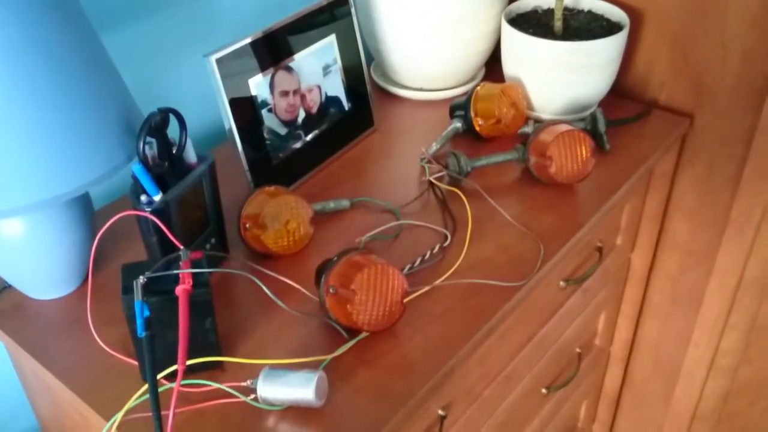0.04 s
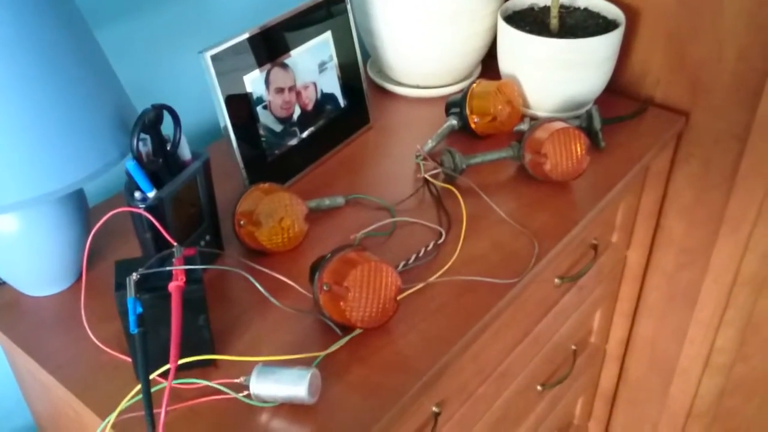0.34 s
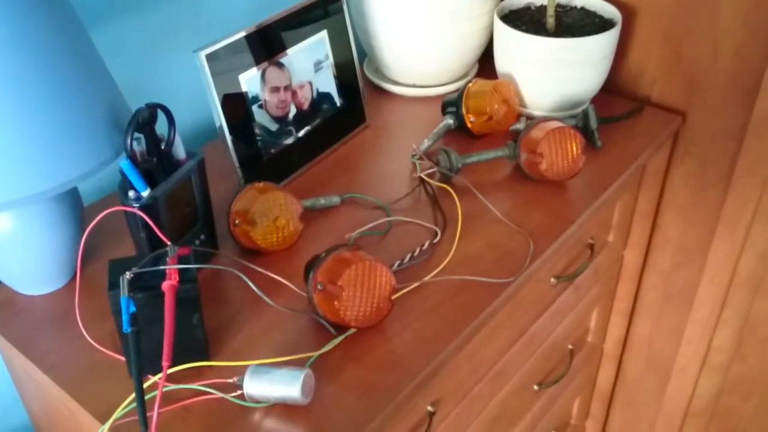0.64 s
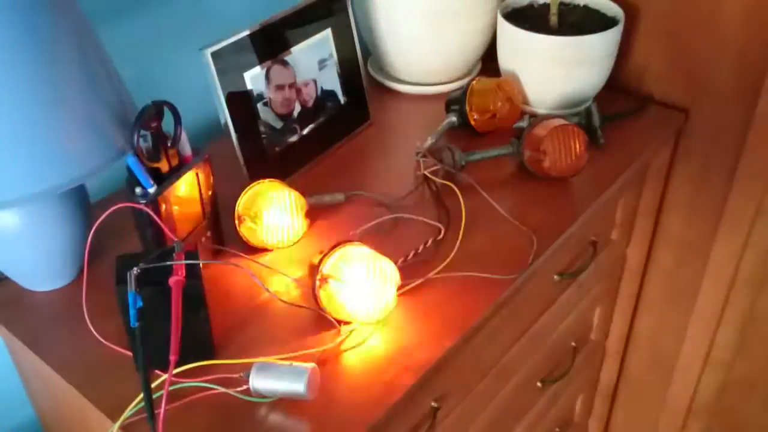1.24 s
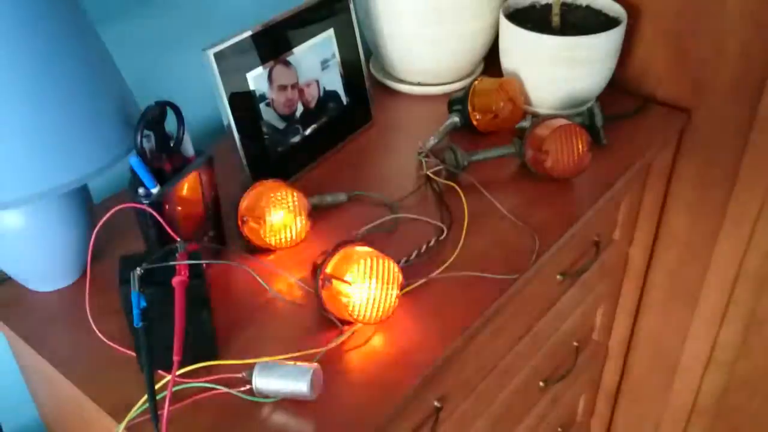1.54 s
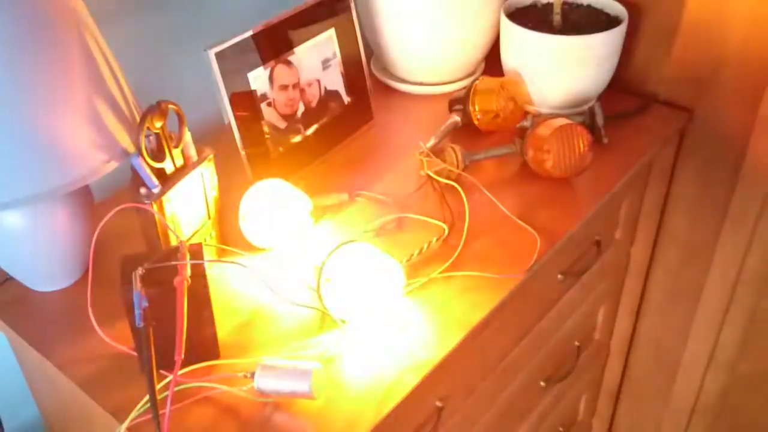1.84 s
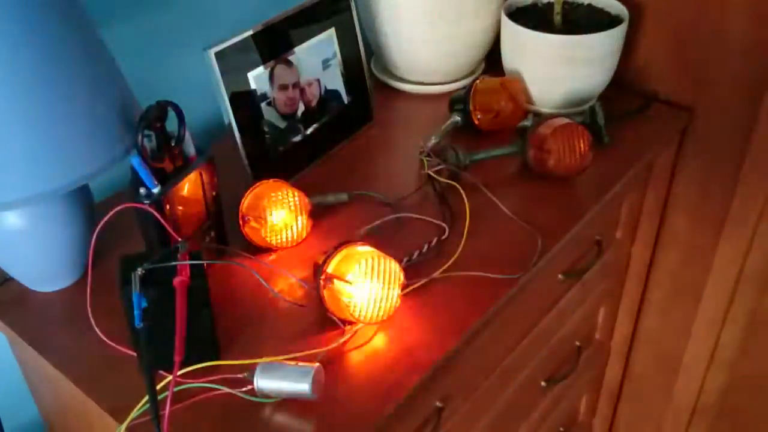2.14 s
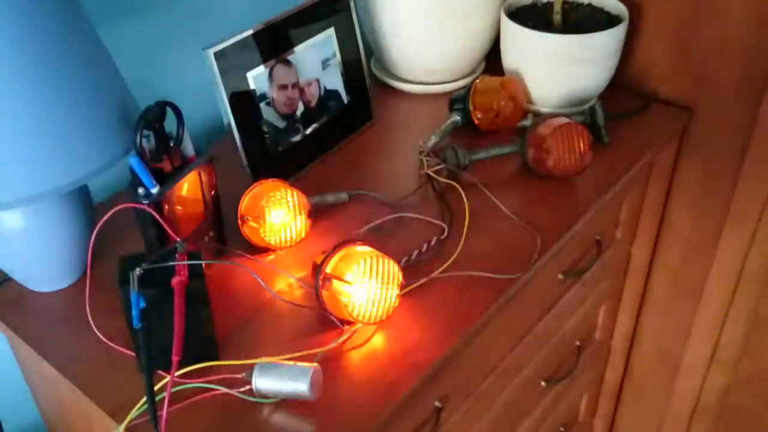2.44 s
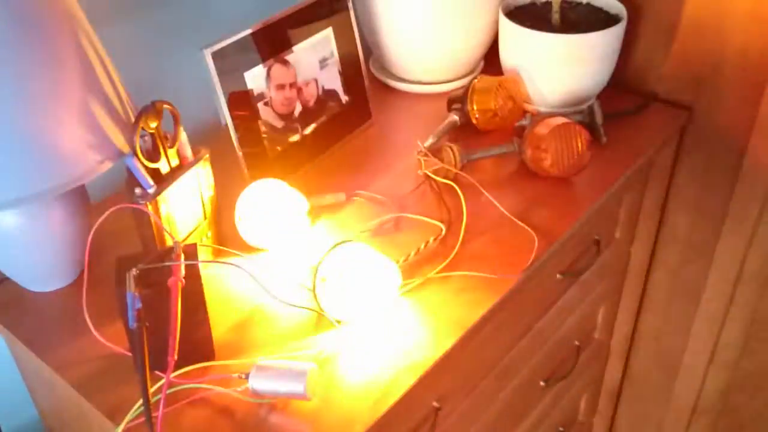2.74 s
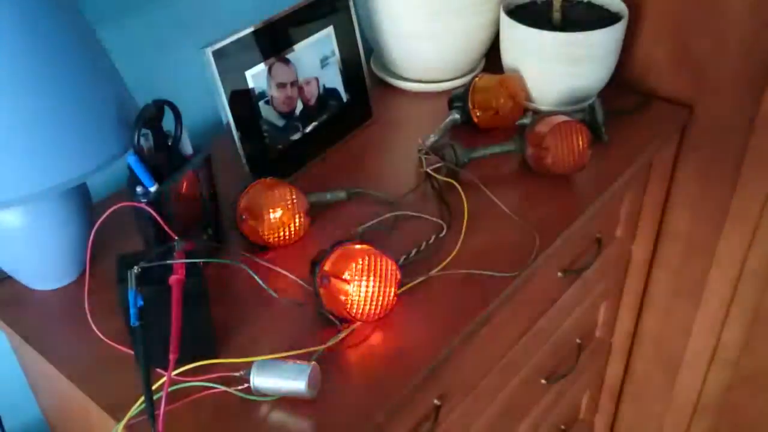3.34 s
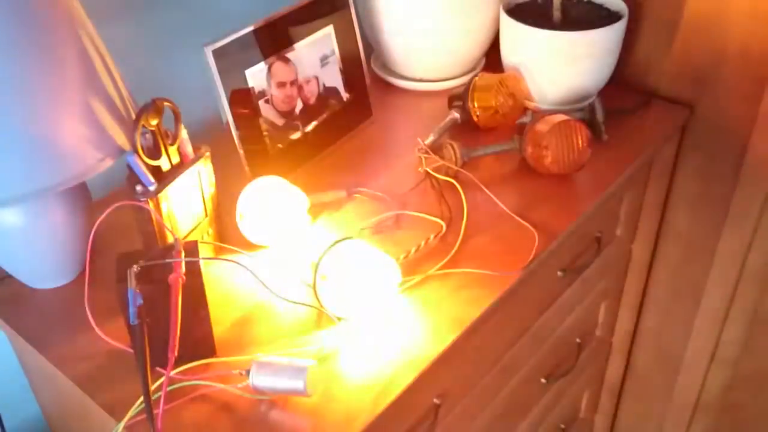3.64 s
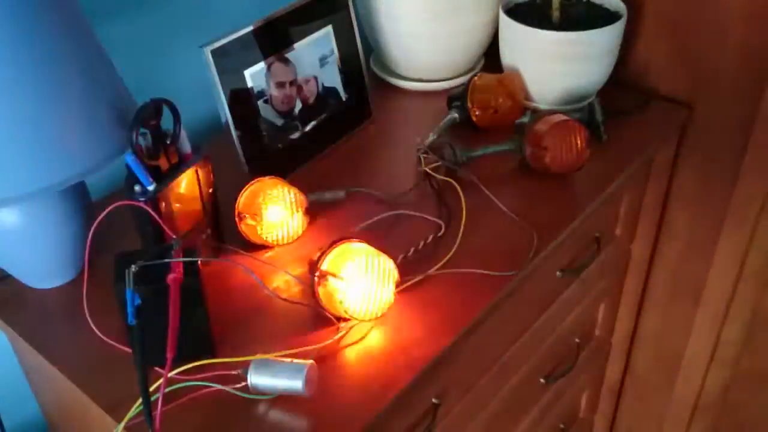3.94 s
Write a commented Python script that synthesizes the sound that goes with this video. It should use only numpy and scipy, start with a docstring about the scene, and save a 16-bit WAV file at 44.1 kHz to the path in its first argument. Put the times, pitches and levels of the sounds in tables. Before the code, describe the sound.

A flasher relay clicks four times on and off, each bright metallic tick answered by a hollower tock, slowing slightly. It sounds close by in a small room with faint hiss, after the brief ring of a sharp snap.

```python
"""Flasher relay on a wooden dresser.

A relay in a metal can switches two signal lamps, a little slower as it goes. Its contact closes with a
bright tick and opens with a hollower tock; both ring the same can, and a low room tone follows each
tock. At the start the small room still rings from one sharp, loud snap; a quiet hiss lies under it all."""
import sys
import numpy as np
from scipy import signal
from scipy.fft import rfft, irfft
from scipy.io import wavfile
from scipy.ndimage import uniform_filter1d

SR = 44100
rng = np.random.default_rng(int(sys.argv[2]) if len(sys.argv) > 2 else 0)


def materialize(psi):
    """Save the field psi as 16-bit PCM at rate SR to the path in sys.argv[1].

    A 1-D psi becomes a single channel; in a 2-D psi each row is a channel.
    """
    bounded = np.clip(np.atleast_2d(psi).T, -1, 1)
    quanta = np.round(bounded * 32767).astype(np.int16)
    wavfile.write(sys.argv[1], SR, quanta)


N = 176400
TIME_S, FREQ_HZ = np.arange(N) / SR, np.arange(N // 2 + 1) * SR / N

# Contact closes, lamps on. Each row: start in seconds, level in dB, tilt in dB per octave,
# extra metallic ring in dB, left minus right in dB.
TICKS = [(.7868, -3.5, -1.1, -5, 6), (1.5932, -1.5, -0.6, 0, 3.5), (2.4801, -0.85, -0.95, 1, 2),
         (3.4043, 0, -0.3, -0.5, 2.5)]
# Contact opens, lamps off. Same columns.
TOCKS = [(1.1731, -1.5, 0.7, -1.5, 1), (2.0181, -0.9, 0.1, -1, 0), (2.9259, 0.2, 0.8, 0.5, 0.5),
         (3.8633, 1, 0.5, -0.5, -1)]
RELAY_DB = 1.5
BOUNCE_MEAN_S, BOUNCE_MEAN_GAIN, BOUNCE_HIGHPASS_HZ = 0.000853, 0.47, 3020
METALLIC_HZ, METALLIC_WIDTH_HZ = 3600, 580

def relay(blows, response):
    """Each blow of the contact rings the can, then bounces once, in the treble only."""
    f, force = FREQ_HZ, 0
    octaves = np.log2(np.maximum(f, 500) / 2000)
    metallic = np.exp(-((f - METALLIC_HZ) / METALLIC_WIDTH_HZ) ** 2)
    for start_s, level_db, tilt_db, ring_db, pan_db in blows:
        lag, size = 0.5 + rng.random(2)
        bounce_gain = BOUNCE_MEAN_GAIN * size * f / (f + BOUNCE_HIGHPASS_HZ)
        bounce = bounce_gain * np.exp(-2j * np.pi * f * BOUNCE_MEAN_S * lag)
        strength = undb(RELAY_DB + level_db + tilt_db * octaves + ring_db * metallic)
        blow = strength * np.exp(-2j * np.pi * f * start_s)
        force = force + stereo(pan_db) * blow * (1 + bounce)
    return signal.fftconvolve(irfft(force, N), response, axes=1)[:, :N]


# Ringing tones of the can, plus a low room tone (657.5 Hz) that swells after each tock.
# Each row: frequency in Hz, width in Hz, closing level in dB, opening level in dB,
# room send in dB, left minus right in dB.
CLICK_RESONANCES = [(593, 32, -22.5, -10.5, 5.5, -8), (657.5, 13.8, -22, -1.5, 7.5, -11.5),
                    (963, 31, -9, -4, -6.5, -10), (1181, 66, -2, -1, -4, -3.5),
                    (1376, 71, -4.5, -2, -0.5, -7), (1448, 132, -4, -9.5, -4.5, -15),
                    (1694, 23, -0.5, -10.5, -2, -9), (1840, 31, -10.5, -10.5, -8.5, -18.5),
                    (2000, 254, -22, -22.5, 4.5, -6.5), (3397, 144, -10.5, -24.5, 7, -12.5),
                    (4100, 272, -10, -22.5, 4, -12.5), (4200, 170, -15.5, -22, 2.5, -10),
                    (5470, 220, -21, -24.5, 4, -10), (6150, 410, -14, -15, -1.5, 6),
                    (7400, 770, -18, -22.5, 1.5, 3), (9430, 730, -36, -31.5, -4, 18.5),
                    (13450, 360, -27, -37, 6, -8)]
CRACK_DB, CRACK_PAN_DB, CRACK_HIGHPASS_HZ = -42.5, -2.5, 2580

def click_response(closing):
    """One blow: the contact cracks, the can and one low room mode ring."""
    s = 1j * FREQ_HZ
    near, tail = room()
    highpass = (s / (s + CRACK_HIGHPASS_HZ)) ** 2
    spectrum = undb(CRACK_DB) * stereo(CRACK_PAN_DB) * highpass * (near + tail)
    for k, (hz, width_hz, closing_db, opening_db, send_db, pan_db) in enumerate(CLICK_RESONANCES):
        resonance = 1j ** k * s * width_hz / (s * s + s * width_hz + hz * hz)
        gain = undb(closing_db if closing else opening_db) * stereo(pan_db)
        spectrum = spectrum + gain * resonance * (near + undb(send_db) * tail)
    return irfft(spectrum, N)[:, :SR]


# Each row: frequency in Hz, left level in dB, right level in dB.
SNAP_SPECTRUM = [(300, -45, -44), (1000, -55, -34), (2840, -30, -18.5), (3800, -18, -4.5), (4290, -16, 2.5),
                 (4940, -14, -7), (6240, -3, -7.5), (7400, -1.5, -1), (8220, 2.5, -7), (8980, -20, -6.5),
                 (10210, 1.5, -8), (10970, -37, -9.5), (13320, -10.5, 2), (14600, -25, -10.5),
                 (16300, -32.5, -7)]
SNAP_DB = -16

def snap():
    """The bright ring that a sharp snap has left in the room."""
    colour_db = np.array([curve(FREQ_HZ, SNAP_SPECTRUM, column) for column in (1, 2)])
    ring = rfft(room_tail(t60_scale=0.88))
    return irfft(ring * undb(SNAP_DB + colour_db), N) * (TIME_S < 1)


# Each row: delay in seconds, fade in seconds, relative left and right levels in dB.
NEAR_PATHS = [(.0005, 0.0026, 2, -4), (.0055, 0.0048, -10, -7.5), (0.0217, .003, -16, -15.5)]
TAIL_DB, TAIL_BUILD_S = -14.5, 0.0048

def room():
    """Spectra of the near paths and the diffuse tail, equalised so that their sum is even."""
    t, near = TIME_S, 0
    tail = undb(TAIL_DB) * room_tail(t60_scale=0.89) * (1 - np.exp(-t / TAIL_BUILD_S))
    for delay_s, fade_s, left_db, right_db in NEAR_PATHS:
        envelope = (t >= delay_s) * np.exp(-abs(t - delay_s) / fade_s)
        near = near + undb([[left_db], [right_db]]) * rng.standard_normal((2, N)) * envelope
    colour = np.sqrt(uniform_filter1d(abs(rfft(near + tail)) ** 2, size=400, axis=1))
    return [rfft(irfft(rfft(part) / colour, N) * (t < 1)) for part in (near, tail)]


# Each row: frequency in Hz, 60 dB decay time in seconds before t60_scale.
ROOM_DECAY = [(500, 0.24), (1500, 0.57), (4000, 0.4), (8000, 0.38), (10500, 0.28), (14000, 0.24)]

def room_tail(t60_scale):
    """Diffuse stereo ring of the room; the mids last longest."""
    noise, tail = rfft(rng.standard_normal((2, N))), 0
    edges_hz = [0, 800, 2000, 3200, 5000, 7000, 9000, 11500, 17000]
    for lo, hi in zip(edges_hz, edges_hz[1:]):
        t60_s = t60_scale * curve((lo + hi) / 2, ROOM_DECAY)
        band = irfft(noise * (FREQ_HZ >= lo) * (FREQ_HZ < hi), N)
        tail = tail + band * undb(-60 * TIME_S / t60_s)
    return tail


# Each row: frequency in Hz, relative level in dB.
RUSH_SPECTRUM = [(100, -47), (350, -5), (900, 0.5), (2000, -3.5), (4500, -10.5), (12000, -27)]
RUSH_START_DB, RUSH_FADE_S = -62, 0.33

def rush():
    """A soft rush of noise that fades in the first second."""
    noise = irfft(rfft(rng.standard_normal((2, N))) * undb(curve(FREQ_HZ, RUSH_SPECTRUM)), N)
    return set_rms(noise, RUSH_START_DB) * np.exp(-TIME_S / RUSH_FADE_S)


# Each row: frequency in Hz, relative level in dB.
HISS_SPECTRUM = [(20, -18), (42, -16), (64, -1), (105, -7.5), (200, -9.5), (400, -8), (800, -6.5),
                 (1500, -9.5), (3000, -12.5), (4700, -21), (6900, -16.5), (8800, -19.5), (11000, -26),
                 (13500, -20), (15800, -22.5)]
# Each row: frequency in Hz, left minus right in dB.
HISS_BALANCE = [(60, 5), (250, 3), (700, 3.5), (2000, .3), (15000, -0.9)]
HISS_DB, HISS_COMMON_SHARE = -68, 0.067

def hiss():
    """Steady room and microphone hiss, mostly independent left and right."""
    separate = np.sqrt(1 - HISS_COMMON_SHARE) * rng.standard_normal((2, N))
    common = np.sqrt(HISS_COMMON_SHARE) * rng.standard_normal(N)
    colour = undb(curve(FREQ_HZ, HISS_SPECTRUM)) * stereo(curve(FREQ_HZ, HISS_BALANCE))
    return set_rms(irfft(rfft(separate + common) * colour, N), HISS_DB)


def undb(db):
    return 10 ** (np.asarray(db) / 20)


def curve(hz, table, column=1):
    """One table column, interpolated over log frequency."""
    table = np.array(table, float)
    return np.interp(np.log(hz + 1e-9), np.log(table[:, 0]), table[:, column])


def set_rms(x, db):
    return x * undb(db) / np.sqrt(np.mean(x ** 2))


def stereo(pan_db):
    """Left and right gains for a level difference."""
    return undb(np.array([[1], [-1]]) * pan_db / 2)


def scene():
    """Tick and tock of the relay, after the snap, over the hiss."""
    ticks = relay(TICKS, click_response(closing=True))
    tocks = relay(TOCKS, click_response(closing=False))
    return ticks + tocks + snap() + hiss() + rush()


def record(dry, cutoff_hz=15850):
    """Steep low-pass."""
    return signal.sosfilt(signal.ellip(12, .1, 80, cutoff_hz, fs=SR, output="sos"), dry)


dry = scene()
out = record(dry)
materialize(out)
```